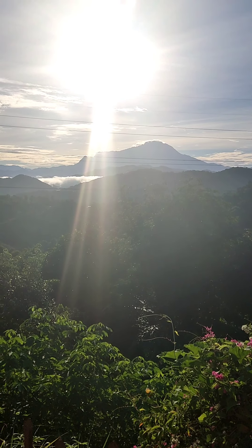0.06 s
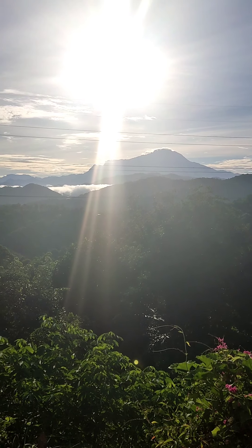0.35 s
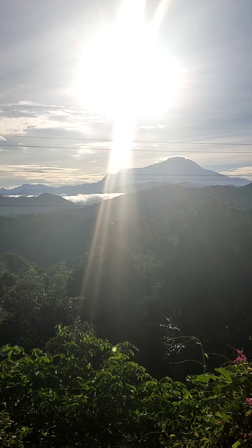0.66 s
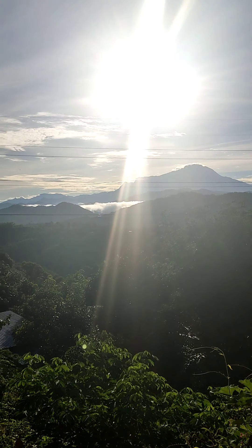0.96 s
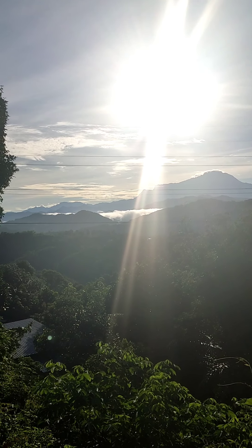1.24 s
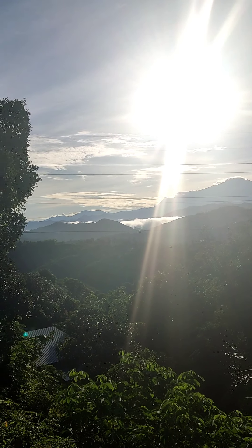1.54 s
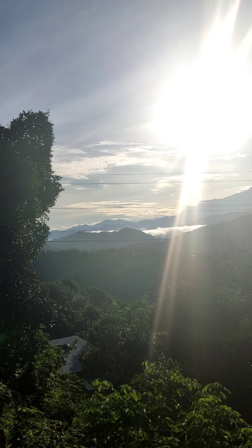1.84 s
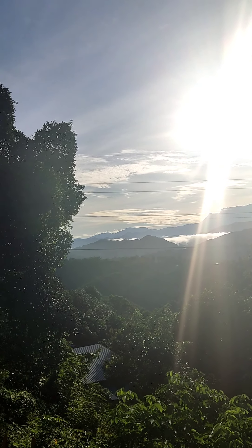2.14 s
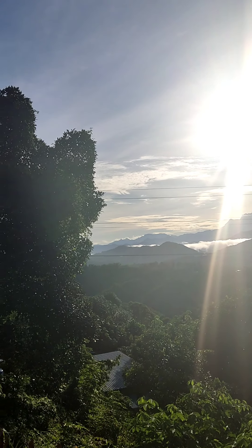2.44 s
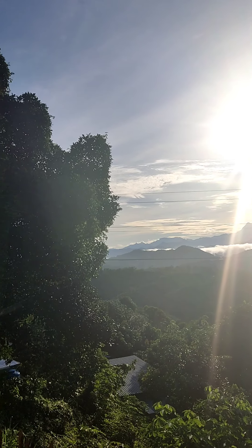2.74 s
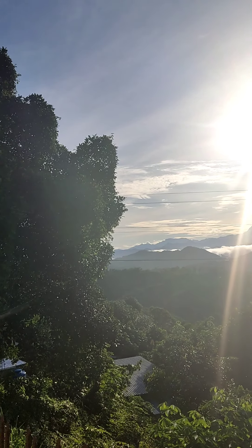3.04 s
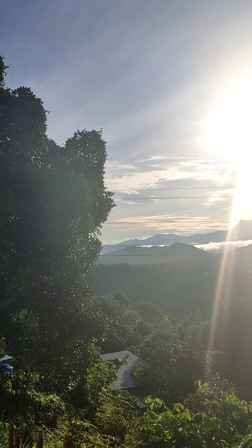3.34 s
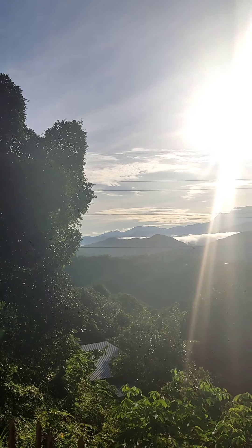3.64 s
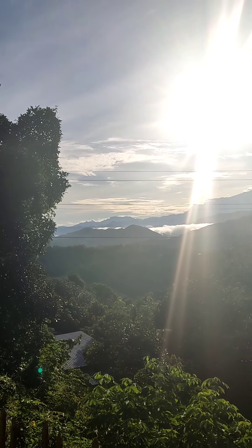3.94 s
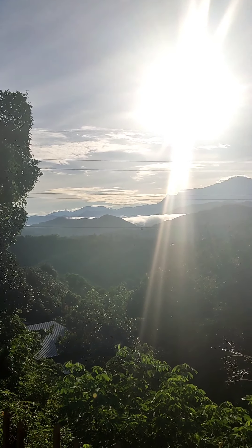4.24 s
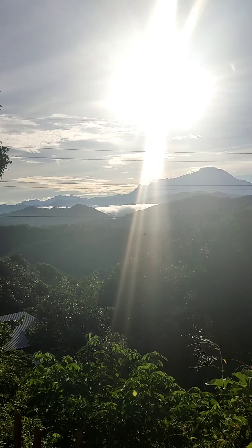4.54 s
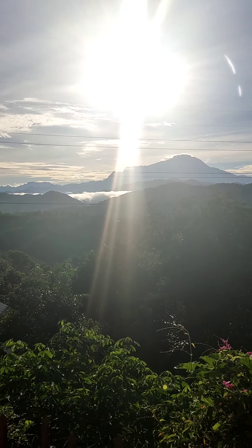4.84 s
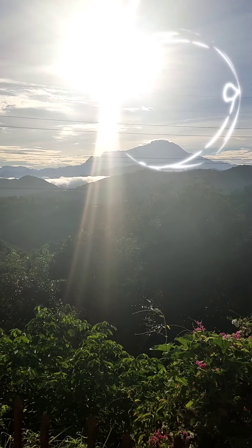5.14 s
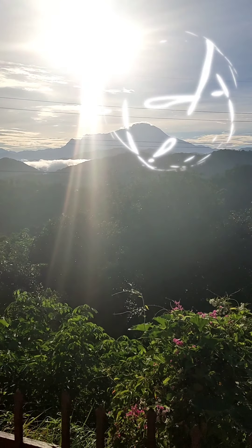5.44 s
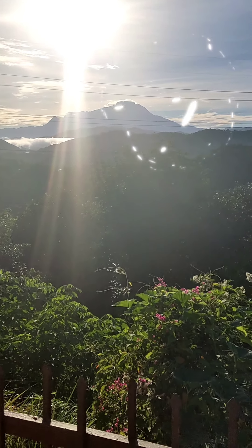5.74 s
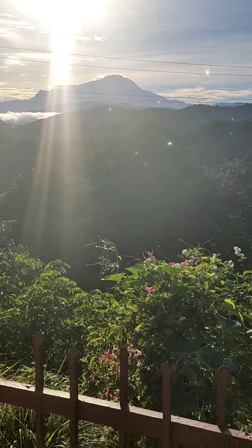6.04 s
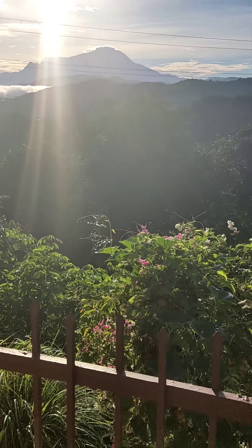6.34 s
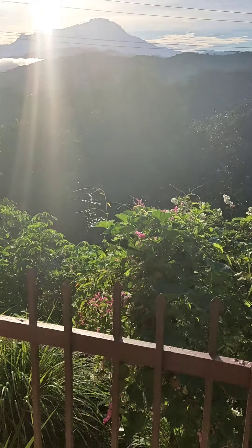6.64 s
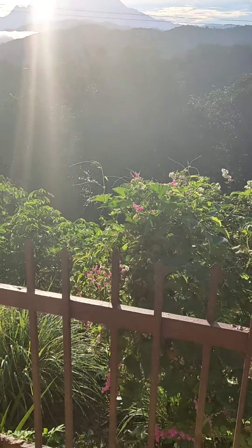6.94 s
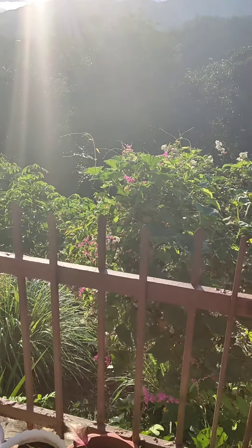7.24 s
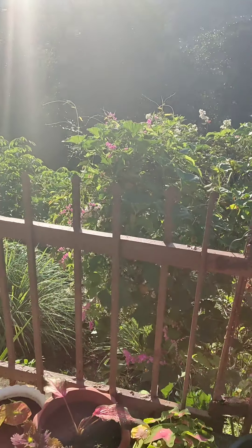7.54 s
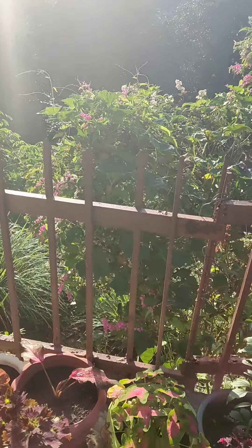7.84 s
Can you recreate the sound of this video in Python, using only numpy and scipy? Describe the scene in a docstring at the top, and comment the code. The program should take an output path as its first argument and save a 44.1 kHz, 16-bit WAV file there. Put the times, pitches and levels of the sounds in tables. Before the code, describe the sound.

In a garden above a forested valley, insects drone on a steady high band over a faint low murmur. A small bird repeats a quick falling phrase about every second and a half, and a second bird adds thin, high chips. Close to the microphone, clothes rustle and snag, with soft knocks and light puffs of air. A third bird pips briefly, then faint distant chirps follow, all lightly echoed by trees.

```python
"""A morning garden above a forested valley. From the start the valley murmurs, insects drone on a high
band, a small bird repeats one quick falling phrase and clothes rustle as the person with the phone turns.
From 0.3 s a second bird chips near 7 kHz among soft knocks; the cloth first snags at 0.9 s, and from
1.7 s light air puffs on the microphone. A third bird pips briefly at 2.7 s, the crickets quicken at 3.2 s
and far birds chirp from 4.1 s. The trees scatter every bird call."""
import sys
import numpy as np
from scipy import signal
from scipy.fft import rfft, irfft
from scipy.io import wavfile

SR = 44100
rng = np.random.default_rng(int(sys.argv[2]) if len(sys.argv) > 2 else 0)


def to_wav(sig):
    """Store sig (one row per channel, or 1-D mono) as 16-bit WAV at the path in sys.argv[1].

    Samples outside -1..1 are clipped; the rate is SR.
    """
    pcm = np.clip(np.atleast_2d(sig), -1, 1) * 32767
    pcm = np.round(pcm).astype(np.int16)
    wavfile.write(sys.argv[1], SR, pcm.T)  # frames by channels


N = 356328
T = np.arange(N) / SR
BINS_HZ = np.arange(N // 2 + 1) * SR / N

# pan = left minus right; width = half-width at -6 dB
# valley murmur spectrum: f/Hz, level/dB
MURMUR_SPECTRUM = [(12, -53), (20, 3.5), (33, -3.5), (76, -2.5), (214, -17), (299, -16), (408, -24),
                   (829, -27), (926, -36), (2250, -33), (4000, -27), (5200, -62), (8800, -120)]
# murmur common to both ports: f/Hz, share/0-1
MURMUR_COHERENCE = [(30, .93), (120, .17), (300, .87), (700, .53), (2000, 0)]
# hum envelope: t/s, level/dB
HUM_ENVELOPE = [(0, 0), (4, 0), (5.2, 5.5), (6.8, -.5), (8.1, -9)]
DRONE_SPECTRUM = [(3500, -16), (4400, -12), (5300, -5.5), (6000, -9), (6350, -5.5), (6700, -1), (7100, 4.3),
                  (7600, 3.2), (8100, -.5), (8800, -5.8), (9600, -6.2), (10300, -7), (11000, -10.5),
                  (12000, -15), (13200, -16.5), (14100, -12)]  # insect drone: f/Hz, level/dB
# how the two microphone ports colour the drone's treble: f/Hz, left minus right/dB
DRONE_PORT_BALANCE = [(4000, 0), (6000, -2), (7200, -7), (8000, -8), (8800, -11.5), (9500, -5), (10300, 4),
                      (11000, 11), (12000, 8), (14000, 5)]
# notes of the phrase: t/s into it, length/s, start f/Hz, middle f/Hz, end f/Hz, level/dB, rasp/0-1
PHRASE_NOTES = [(.002, .032, 4150, 4130, 4080, -8.5, .1), (.06, .028, 4420, 4300, 4320, -10, .15),
                (.086, .017, 4350, 4180, 3550, -2.5, .25), (.129, .027, 4030, 3880, 3990, 0, .08),
                (.194, .028, 4100, 3930, 3980, 1.5, .08), (.226, .019, 4020, 3850, 3520, 0, .2),
                (.252, .032, 3150, 3720, 2800, -2, .36), (.295, .034, 2650, 3330, 3480, -4.5, .34),
                (.331, .03, 3800, 3300, 2400, -3.5, .38), (.384, .042, 2400, 2790, 2960, -9.5, .2)]
# repeats of the phrase: t/s, level/dB, pan/dB, direct path through leaves/dB
PHRASE_REPEATS = [(-.026, -44, 0, -4), (1.461, -44, -1.5, -2.5), (2.781, -43.7, 0, -1.5),
                  (3.91, -41.5, -.5, 0), (5.191, -40.7, 0.5, -1.5), (6.666, -41.2, -2.5, .5)]
# long cloth slides: t/s, length/s, rise/s, rub level/dB, hiss level/dB, firmness/0-1
CLOTH_SLIDES = [(0.488, 1.45, 0.033, -86, -56.5, 0), (2.186, 0.24, 0.075, -53.5, -56, 0.02),
                (2.716, 0.21, .04, -64, -56, 0.2), (2.88, 0.32, 0.035, -52, -53, 0),
                (3.137, 0.27, 0.043, -50, -48.5, 0.1), (3.41, 0.27, 0.06, -51.5, -56.5, 0),
                (3.636, 0.17, 0.043, -57.5, -46, 0.63), (3.754, 0.24, 0.033, -58.5, -48, 0.08),
                (3.966, 0.41, 0.052, -58.5, -63, 0.37), (4.323, 0.426, 0.11, -52, -57.5, 0.83),
                (4.669, 0.35, 0.024, -52.5, -50, 0.97), (5.498, 0.29, 0.11, -63, -59, 0.68),
                (5.895, 0.35, 0.054, -62, -58.5, 0.6), (6.606, 0.3, 0.045, -62, -61.5, 0.96),
                (6.97, 0.13, 0.044, -63, -53, 0.5), (7.245, 0.44, 0.16, -59.5, -57, 0.67),
                (7.6, 0.62, 0.043, -64.5, -60, 0.24)]
# short cloth scuffs: t/s, length/s, rub level/dB, hiss level/dB, squeak level/dB
CLOTH_SCUFFS = [(0.0, 0.11, -52.5, -49.5, -65), (0.251, 0.11, -51.5, -57, -69),
                (0.297, 0.19, -58, -60, -80), (0.458, 0.067, -55.5, -45, -83),
                (0.94, 0.095, -54.5, -34.5, -51), (1.032, 0.064, -53, -43.5, -80),
                (1.443, 0.073, -52, -39, -75), (1.744, 0.07, -59.5, -51, -72),
                (1.954, 0.056, -51, -52, -73), (2.695, 0.036, -52.5, -64, -74),
                (2.723, 0.076, -48, -61, -57), (2.897, 0.045, -55, -67, -58), (3.19, 0.11, -50.5, -52, -77),
                (3.283, 0.037, -49.5, -55, -64), (3.37, 0.079, -47, -47.5, -78),
                (5.659, 0.041, -56.5, -51.5, -82), (6.05, 0.025, -72, -52, -80),
                (6.13, 0.068, -60.5, -47, -80), (6.688, 0.035, -80, -51, -82),
                (6.734, 0.031, -56, -67, -80), (7.683, 0.066, -59, -51.5, -80),
                (7.87, 0.037, -76, -53, -80)]
# cloth spectra (light rub, firm rub, fibre hiss): f/Hz, level/dB
LIGHT_SPECTRUM = [(100, -16), (220, 1.5), (450, -1), (700, 4.5), (950, 1), (1400, 3), (2200, 0.5),
                  (3200, 5), (5000, -6.5), (8000, -0.5), (14000, -52)]
FIRM_SPECTRUM = [(100, -20), (280, 4), (600, 1), (1000, 2.5), (1500, -4), (2600, 1), (4500, -1),
                 (8000, -12), (14000, -50)]
FIBRE_SPECTRUM = [(1000, -42), (3000, -16), (4500, -8.5), (6300, -6), (7600, -18), (8700, -7), (9500, 3.5),
                  (11000, -3.5), (12300, -6.5), (14200, -10)]
# cloth resonances (light rub, firm rub, fibre hiss, thin scuff ring): f/Hz, width/Hz, level/dB
LIGHT_MODES = [(825, 58, -1.5), (1335, 150, 3), (1730, 70, 2), (2050, 130, 2.5), (2570, 45, -6)]
FIRM_MODES = [(510, 46, -5), (685, 60, -0.5), (944, 67, -1), (1557, 79, -2), (2820, 190, -4)]
FIBRE_MODES = [(7960, 140, -6.5), (8720, 580, -3), (9880, 270, -10), (11030, 300, -10)]
SCUFF_MODES = [(7620, 60, -3), (8640, 45, 0), (8840, 35, 0), (10050, 35, -1), (10560, 45, -2),
               (10900, 35, -1), (11550, 35, -5), (12140, 30, -6)]
# how differently the two microphone ports hear the cloth's hiss: f/Hz, left minus right/dB
FIBRE_PORT_BALANCE = [(6000, -0.5), (8700, -19.5), (9500, -0.5), (10500, 9.5), (11500, 16), (13000, 8)]
SOFT_KNOCKS = [(.262, 490, 89, -45, 0.014), (.264, 1390, 160, -56.5, 0.056), (0.466, 452, 90, -42, 0.01),
               (1.445, 420, 200, -48, 0.02), (1.968, 1260, 200, -52.5, 0.032),
               (2.742, 330, 200, -54.5, 0.029), (3.198, 222, 100, -49.5, 0.066),
               (3.199, 520, 300, -52, 0.031), (3.39, 136, 30, -52.5, 0.04), (3.615, 123, 30, -47, 0.042),
               (6.082, 104, 40, -49, 0.028), (7.902, 99, 44.4, -49.5, 0.02)]  # contacts: t/s, f/Hz, width/Hz, level/dB, decay/s
HIGH_CHIPS = [(.284, 7080, -35, -8), (1.754, 7000, -39.5, -12), (2.841, 6970, -34, -1.5),
              (4.086, 6850, -38, -5), (5.479, 6800, -40, -7), (6.676, 6800, -41.5, -9),
              (7.779, 6900, -47, -13)]  # second bird: t/s, f/Hz, level/dB, pan/dB
CLOTH_SNAGS = [(.944, -52, -35), (.984, -52, -27), (1.451, -47, -36), (1.489, -56, -33), (2.741, -45, -55),
               (2.906, -49, -60), (3.203, -44, -52), (3.232, -44, -50), (3.292, -46, -48),
               (3.386, -46, -48), (4.048, -51, -60), (4.111, -50, -60), (4.184, -49, -55),
               (4.397, -46, -60), (4.474, -48, -60), (4.551, -45, -55), (4.594, -47, -58),
               (4.834, -46, -55), (4.891, -47, -55), (4.944, -50, -58)]  # catches: t/s, tick level/dB, snap level/dB
AIR_PUFFS = [(1.7, 0.36, -47, 8.5), (2.961, 0.25, -48, -1), (3.19, 0.48, -49, 1), (3.573, 0.35, -50.5, 1),
             (6.012, 0.17, -49.5, -17), (6.146, 0.075, -52.5, 10), (6.728, 0.24, -51, 1),
             (7.895, 0.05, -44, -18)]  # air on the microphone: t/s, length/s, level/dB, pan/dB
# puff spectrum: f/Hz, level/dB
PUFF_SPECTRUM = [(10, -24), (35, 7), (70, -5), (130, -10.5), (250, -57), (800, -47)]
CLEAR_PIPS = [(2.74, 0.017, 5000, -32, -10.5), (2.801, 0.025, 5020, -32, -11),
              (2.831, 0.015, 5020, -34, -9), (2.841, 0.027, 5140, -35.5, -4), (2.868, .025, 5180, -39, 0)]  # third bird: t/s, length/s, f/Hz, level/dB, pan/dB
# far birds: t/s, length/s, start f/Hz, end f/Hz, level/dB, rasp/0-1
DISTANT_CHIRPS = [(4.071, .13, 8370, 8450, -54, .04), (4.19, 0.12, 8480, 8500, -60, .04),
                  (4.263, 0.12, 8020, 7630, -56, 0.2), (6.127, 0.023, 4750, 4240, -54.5, .3),
                  (6.418, 0.024, 4700, 4250, -51, .25), (7.924, 0.026, 4800, 4300, -57, 0.3)]


def undb(db):
    """Decibels to gain."""
    return 10 ** (np.asarray(db) / 20)


def unit(x):
    """Scale to rms 1."""
    return x / np.sqrt(np.mean(x ** 2))


def panned(pan_db):
    """Left and right gain, as a column."""
    return undb(np.array([[.5], [-.5]]) * pan_db)


def per_bin(points):
    """Interpolate (f/Hz, value) points to the FFT bins on a log axis."""
    hz, value = np.transpose(points)
    return np.interp(np.log(BINS_HZ + 1), np.log(hz), value)


def filtered(x, response):
    """Apply a gain per FFT bin."""
    return irfft(rfft(x) * response, N)


def colour(x, spectrum):
    """Shape by a spectrum; rms 1."""
    return unit(filtered(x, undb(per_bin(spectrum))))


def ring(x, modes):
    """Parallel resonances with steep skirts; rms 1."""
    response = sum(undb(db) / np.sqrt(width_hz) / (1 + 1j * (BINS_HZ - hz) / width_hz) ** 2
                   for hz, width_hz, db in modes)
    return unit(filtered(x, response))


def resonate(x, hz, width_hz):
    """One resonance; rms 1."""
    return ring(x, [(hz, width_hz, 0)])


def noise(coherence=0):
    """Stereo noise with a share of power common to both sides."""
    common = rng.standard_normal(N)
    return np.sqrt(coherence) * common + np.sqrt(1 - coherence) * rng.standard_normal((2, N))


def walk(rate_hz):
    """Interpolated random values, spread near 1."""
    return np.interp(T * rate_hz, np.arange(N // 8), rng.standard_normal(N // 8)) * np.sqrt(3 / 2)


def blend(a, b, share):
    """Equal-power mix; share is that of a."""
    return np.sqrt(share) * a + np.sqrt(1 - share) * b


def phase_of(hz):
    """Integrate frequency to radians."""
    return 2 * np.pi * np.cumsum(hz) / SR


def swell(start, length, peak, t=T):
    """Rounded rise and fall; peak is a share of the length."""
    return np.sin(np.pi / 2 * np.interp(t, start + length * np.array([0, peak, 1]), [0, 1, 0]))


def add(out, start_s, sound):
    """Mix a sound in at a time."""
    i = int(start_s * SR)
    a, b = max(i, 0), min(i + sound.shape[-1], N)
    if b > a:
        out[:, a:b] += sound[:, a - i:b - i]


def valley_murmur(level_db=-55, drift_db=1):
    """Far murmur; long waves reach both ports more alike than short ones."""
    spectrum = blend(rfft(noise(.99)), rfft(noise()), per_bin(MURMUR_COHERENCE))
    return colour(irfft(spectrum, N), MURMUR_SPECTRUM) * undb(level_db + drift_db * walk(8.4))


def valley_hum(hz=190, base_db=-73):
    """Faint low hum; swells after 4 s, then fades."""
    envelope_db = np.interp(T, *np.transpose(HUM_ENVELOPE))
    return resonate(noise(1), hz, width_hz=17.5) * undb(base_db + envelope_db)


def insect_drone(level_db=-49, flicker_db=1.14, pulse_hz=46, pulse_depth=.051):
    """Many buzzing insects merge into a flickering band."""
    buzz = 1 + pulse_depth * np.sin(phase_of(pulse_hz * (1 + .013 * walk(3.4))))
    drone = colour(noise() * buzz * undb(flicker_db * walk(25)), DRONE_SPECTRUM)
    return undb(level_db) * filtered(drone, panned(per_bin(DRONE_PORT_BALANCE)))


def crickets(hz=5220, level_db=-61, slow_hz=4.81, quick_hz=5.48, first_s=.07, quicken_s=3.19, depth=.38):
    """A chorus below the drone throbs steadily, then quickens."""
    cycles = slow_hz * (np.minimum(T, quicken_s) - first_s) + quick_hz * np.maximum(T - quicken_s, 0)
    throb = 1 + depth * np.cos(2 * np.pi * cycles)
    return resonate(noise(), hz, width_hz=380) * throb * undb(level_db) * panned(-3)


def near_insects(range_hz=(7100, 7900), level_db=-65, swell_db=3, count=4):
    """Nearer insects swell and fade, each on its own pitch."""
    voices = sum(resonate(noise(.13), hz, width_hz=55) * undb(swell_db * walk(3.8))
                 for hz in rng.uniform(*range_hz, count))
    return voices * undb(level_db) * panned(-3.5)


def whistle(length_s, pitches_hz, waver=.0019, rasp=0, rasp_depth=.098, peak=.81, overtone_db=-60):
    """Bird note bent through three pitches; rasp shakes pitch and level."""
    u = np.linspace(0, 1, int(length_s * SR))
    slow, quick, flutter = (np.interp(u, np.linspace(0, 1, knots), rng.standard_normal(knots))
                            for knots in (10, 24, 14))
    contour_hz = np.polyval(np.polyfit([0, .5, 1], pitches_hz, 2), u)
    phase = phase_of(contour_hz * (1 + waver * slow + rasp * rasp_depth * quick))
    envelope = swell(0, 1, peak, u) * (1 + rasp * flutter)
    return envelope * (np.sin(phase) + undb(overtone_db) * np.sin(2 * phase))


def lag_left(x, samples):
    """Sound reaches the left port after the right."""
    return np.array([np.roll(x[0], samples), x[1]])


def trees(x, near_db, near_t60_s, far_db, far_t60_s, build_s=.0034, direct_db=0):
    """Trunks and leaves scatter a call: a short echo cluster and a faint long tail."""
    t = T[:SR]
    onset = np.clip(t / build_s, 0, 1)
    echoes = 0
    for db, t60_s in ((near_db, near_t60_s), (far_db, far_t60_s)):
        tail = rng.standard_normal((2, SR)) * undb(-60 * t / t60_s) * onset
        echoes += undb(db) * unit(tail) / np.sqrt(SR)
    return undb(direct_db) * lag_left(x, 3) + signal.fftconvolve(x, echoes, axes=1)[:, :N]


def songbird(detune=.0055, stray_db=1):
    """Ten notes, slurs then buzzy falling arches, never quite alike; leaves partly hide the bird."""
    out = np.zeros((2, N))
    for start_s, db, pan_db, _ in PHRASE_REPEATS:
        for after_s, length_s, *pitches_hz, note_db, rasp in PHRASE_NOTES:
            sharp, strong = rng.standard_normal(2)
            sung_hz = (1 + detune * sharp) * np.array(pitches_hz)
            note = whistle(length_s, sung_hz, rasp=rasp, rasp_depth=.14, peak=.52)
            add(out, start_s + after_s, note * undb(db + note_db + stray_db * strong) * panned(pan_db))
    starts_s, _, _, direct_db = np.transpose(PHRASE_REPEATS)
    repeat = np.maximum(np.searchsorted(starts_s, T) - 1, 0)
    return trees(out, near_db=-4.5, near_t60_s=.19, far_db=-10.5, far_t60_s=.7,
                 build_s=.005, direct_db=direct_db[repeat])


def cloth_friction(grain_db=1, rub_modal_share=.28, hiss_modal_share=.36):
    """Cloth slips in tiny catches: light rub, duller firm rub, fibre hiss."""
    grains = undb(grain_db * walk(900))
    slips = noise(.13) * grains
    light = blend(ring(slips, LIGHT_MODES), colour(noise(.42) * grains, LIGHT_SPECTRUM), rub_modal_share)
    firm = blend(ring(slips, FIRM_MODES), colour(noise(.25) * grains, FIRM_SPECTRUM), rub_modal_share)
    ringing = ring(noise(.098) * grains, FIBRE_MODES)
    hiss = blend(ringing, colour(noise(.075) * grains, FIBRE_SPECTRUM), hiss_modal_share)
    return light, firm, filtered(hiss, panned(per_bin(FIBRE_PORT_BALANCE)))


def clothes(flutter_hz=30, rub_catch_db=1.7, hiss_catch_db=2.6, release_s=.078, scuff_firmness=.21):
    """Slides and scuffs drive the friction, adding in power; scuffs also squeak and ring."""
    light, firm, hiss = cloth_friction()
    phase = phase_of(flutter_hz * (1 + .038 * walk(4.2)))
    flutter = 1 + .21 * np.cos(phase) + .15 * np.cos(phase / 2)  # every second catch is stronger
    rub_catch = flutter * undb(rub_catch_db * walk(35))
    hiss_catch = undb(hiss_catch_db * walk(35))
    contacts, squeak_gain, ring_gain = [], 0, 0
    for start_s, length_s, rise_s, rub_db, hiss_db, firmness in CLOTH_SLIDES:
        speed = np.clip(np.minimum((T - start_s) / rise_s, (start_s + length_s - T) / release_s), 0, 1)
        contacts.append((speed * undb(rub_db) * rub_catch, speed * undb(hiss_db) * hiss_catch, firmness))
    for start_s, length_s, rub_db, hiss_db, squeak_db in CLOTH_SCUFFS:
        speed = swell(start_s, length_s, peak=.26)
        contacts.append((speed * undb(rub_db), speed * undb(hiss_db), scuff_firmness))
        squeak_gain += speed * undb(squeak_db)
        ring_gain += speed * undb(hiss_db - 4)
    light_power = sum(rub ** 2 * (1 - firmness) for rub, _, firmness in contacts)
    firm_power = sum(rub ** 2 * firmness for rub, _, firmness in contacts)
    hiss_power = sum(gain ** 2 for _, gain, _ in contacts)
    rustle = np.sqrt(light_power) * light + np.sqrt(firm_power) * firm + np.sqrt(hiss_power) * hiss
    squeak = resonate(noise(.57), hz=1570, width_hz=170)
    return rustle + squeak_gain * squeak + ring_gain * ring(noise(.16), SCUFF_MODES)


def knocks(rise_s=.014):
    """Soft contacts each ring one damped resonance."""
    out = 0
    for start_s, hz, width_hz, db, decay_s in SOFT_KNOCKS:
        age_s = np.maximum(T - start_s, 0)
        envelope = np.minimum(age_s / rise_s, 1) * np.exp(-age_s / decay_s)
        out += resonate(noise(.97), hz, width_hz) * undb(db) * envelope
    return out


def chipping_bird(length_s=.0273, bend=(1.015, .98, .915)):
    """Thin chips start sharply and slide down, blurred by foliage."""
    out = np.zeros((2, N))
    for start_s, hz, db, pan_db in HIGH_CHIPS:
        chip = whistle(length_s, hz * np.array(bend), rasp=.26, peak=.2)
        add(out, start_s, chip * undb(db) * panned(pan_db))
    return trees(out, near_db=-4, near_t60_s=.22, far_db=-15, far_t60_s=.6)


def snags(tick_decay_s=.0044, snap_decay_s=.00072):
    """Cloth catches and lets go: a dull tick, plus a bright snap when taut."""
    dull, bright = colour(noise(.23), LIGHT_SPECTRUM), colour(noise(.27), FIBRE_SPECTRUM)
    out = 0
    for start_s, tick_db, snap_db in CLOTH_SNAGS:
        age_s = np.maximum(T - start_s, 0)
        tick = dull * undb(tick_db) * np.exp(-age_s / tick_decay_s)
        snap = bright * undb(snap_db) * np.exp(-age_s / snap_decay_s)
        out += (T >= start_s) * (tick + snap)
    return out


def air_puffs():
    """Low puffs strike each microphone port differently."""
    rumble = colour(noise(.49), PUFF_SPECTRUM)
    return sum(rumble * swell(start_s, length_s, peak=.31) * undb(db) * panned(pan_db)
               for start_s, length_s, db, pan_db in AIR_PUFFS)


def pipping_bird():
    """A nearer bird gives one run of level-pitched pips."""
    out = np.zeros((2, N))
    for start_s, length_s, hz, db, pan_db in CLEAR_PIPS:
        pip = whistle(length_s, [hz] * 3, waver=.0023, overtone_db=-17)
        add(out, start_s, pip * undb(db) * panned(pan_db))
    return trees(out, near_db=-10.5, near_t60_s=.33, far_db=-16, far_t60_s=.7)


def far_birds():
    """Distant gliding chirps arrive mostly as echo."""
    out = np.zeros((2, N))
    for start_s, length_s, from_hz, to_hz, db, rasp in DISTANT_CHIRPS:
        chirp = whistle(length_s, np.linspace(from_hz, to_hz, 3), waver=.003, rasp=rasp)
        add(out, start_s, chirp * undb(db) * panned(-2))
    return trees(out, near_db=3, near_t60_s=.17, far_db=-8, far_t60_s=.6)


def scene(cloth_lag_s=.00046):
    """Valley, insects and birds beyond; cloth, knocks and air at the phone."""
    background = valley_murmur() + valley_hum() + insect_drone() + crickets() + near_insects()
    birds = songbird() + chipping_bird() + pipping_bird() + far_birds()
    cloth = lag_left(clothes() + snags(), int(cloth_lag_s * SR))
    return background + birds + cloth + knocks() + air_puffs()


def record(dry, cutoff_hz=14250):
    """The phone's steep low-pass."""
    return signal.sosfilt(signal.ellip(12, .1, 80, cutoff_hz, fs=SR, output="sos"), dry)


dry = scene()
out = record(dry)
to_wav(out)
```